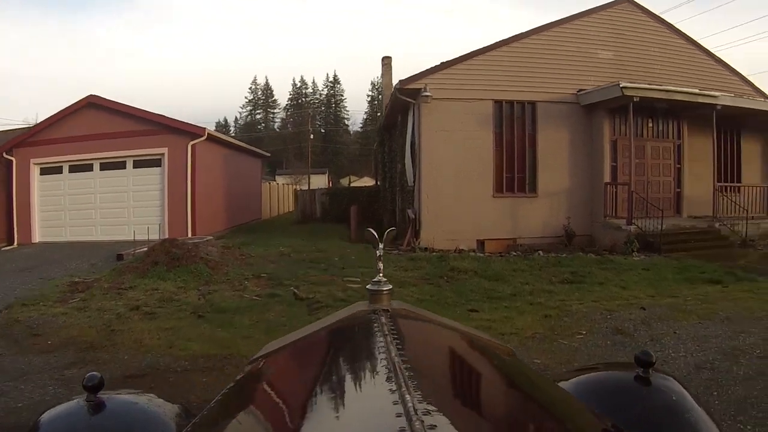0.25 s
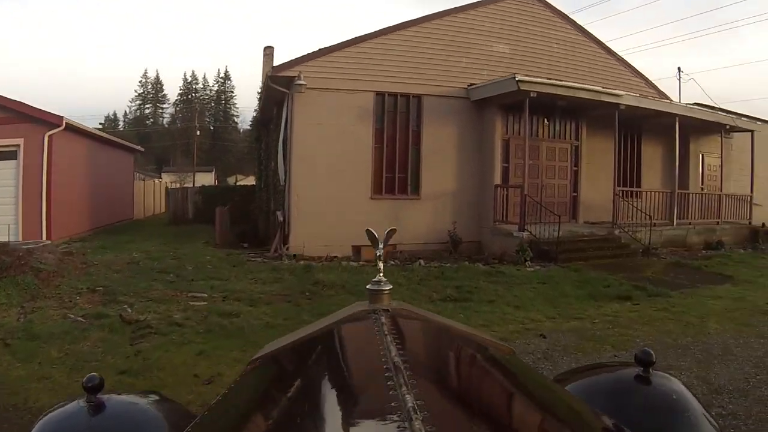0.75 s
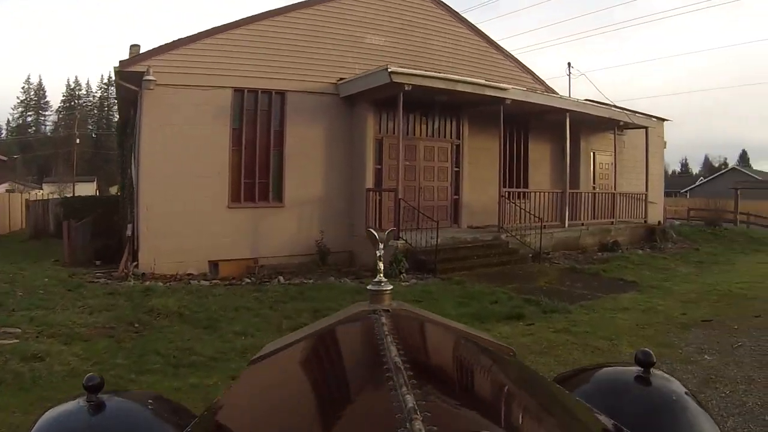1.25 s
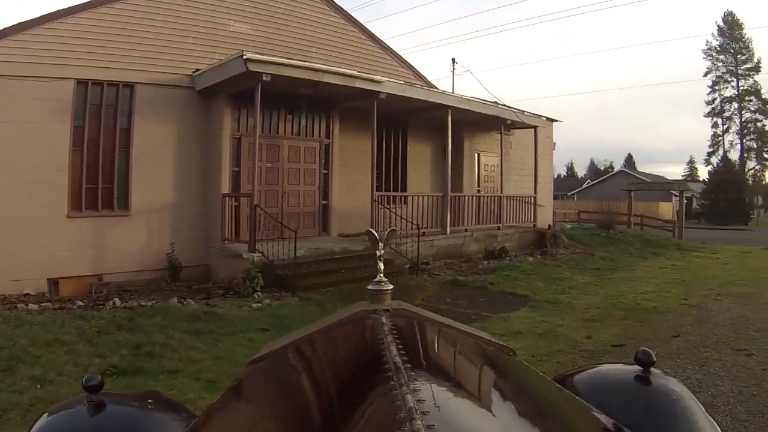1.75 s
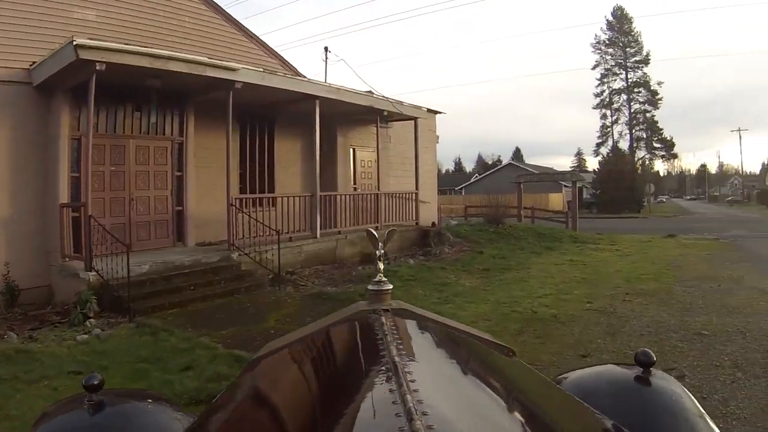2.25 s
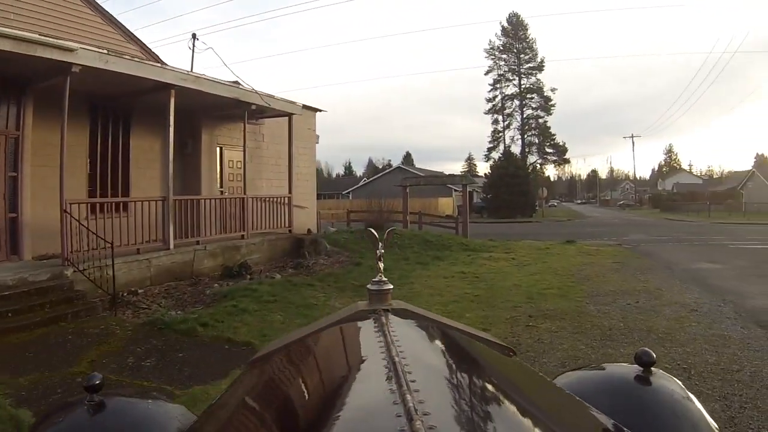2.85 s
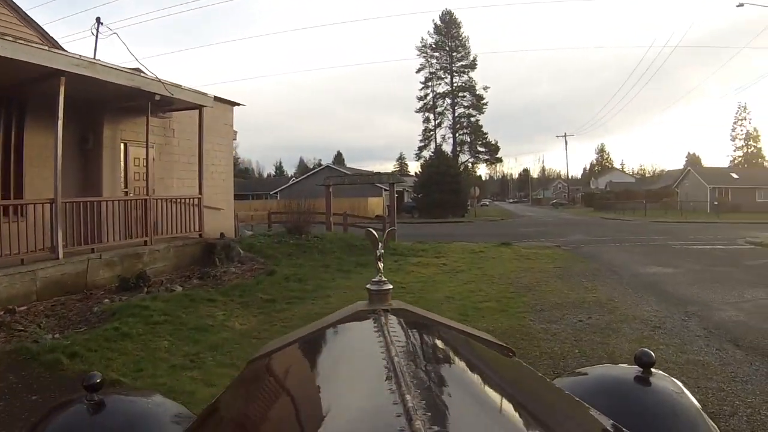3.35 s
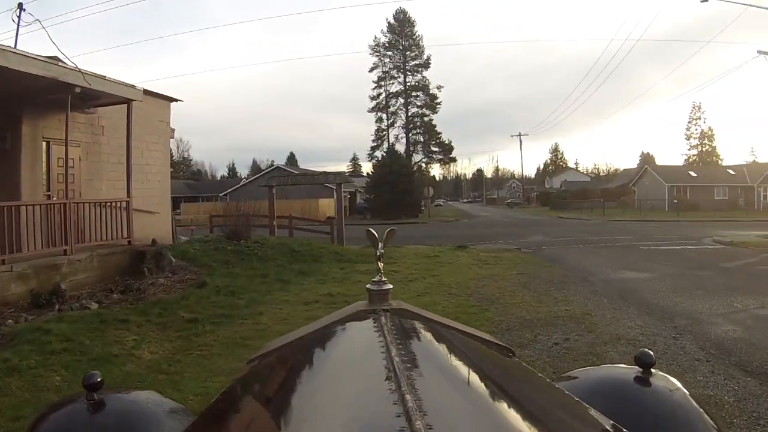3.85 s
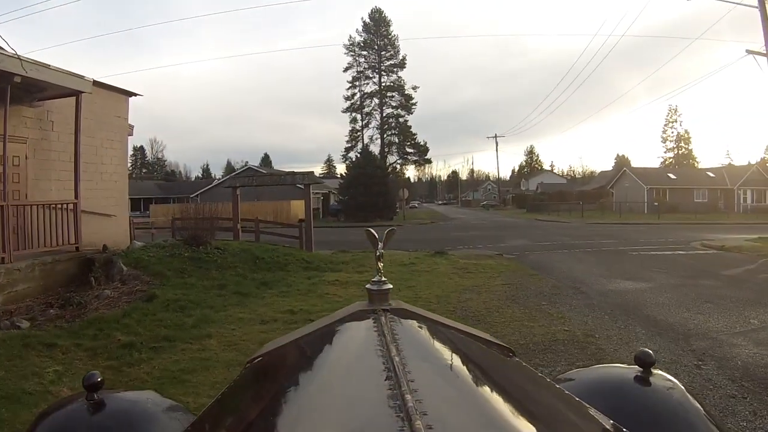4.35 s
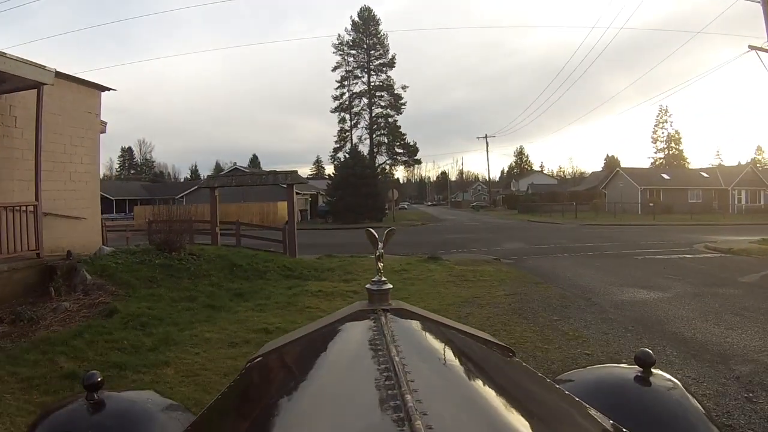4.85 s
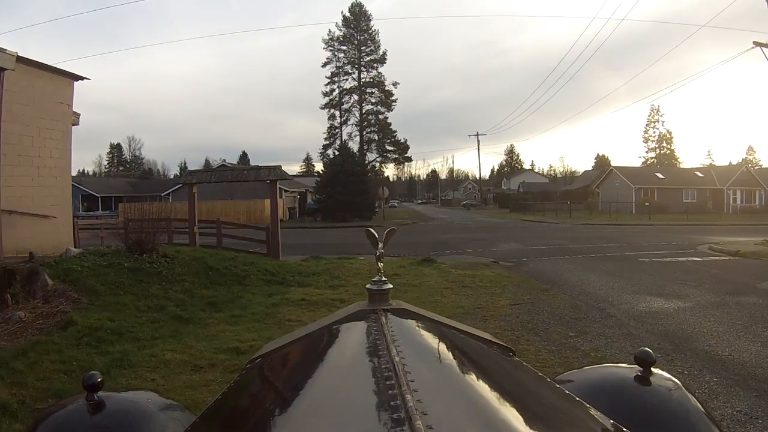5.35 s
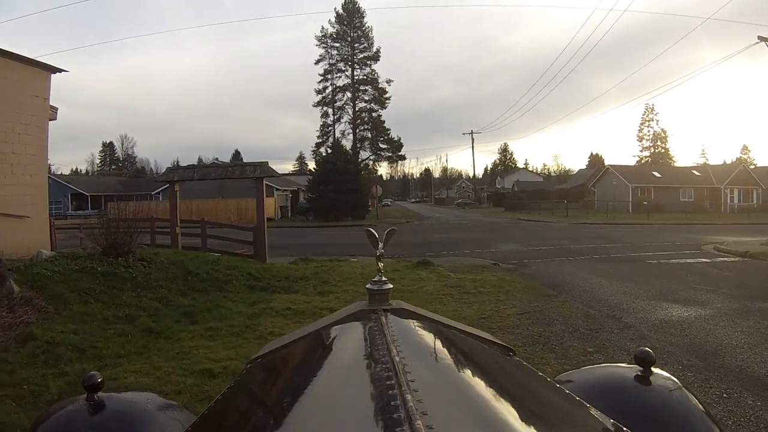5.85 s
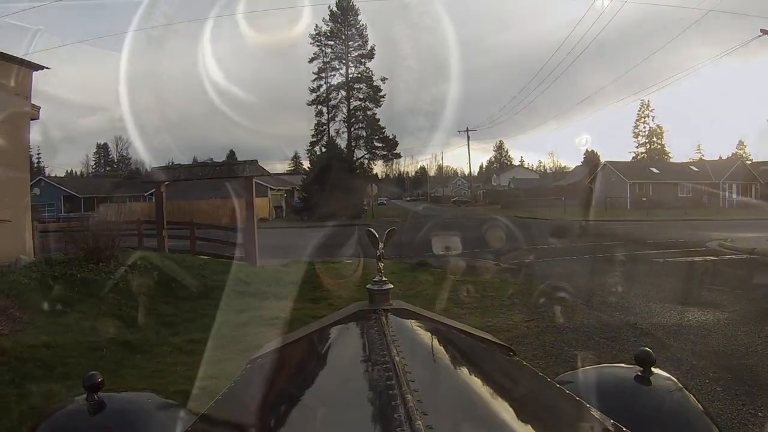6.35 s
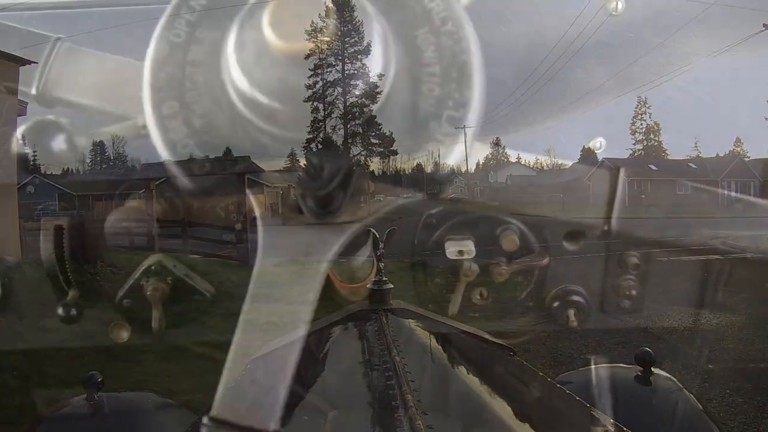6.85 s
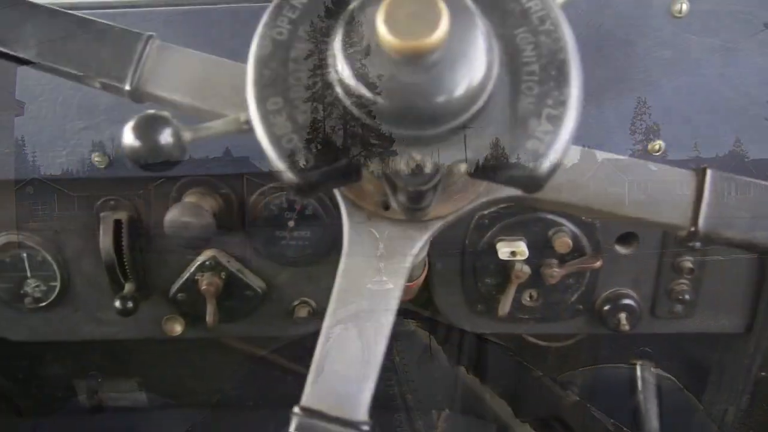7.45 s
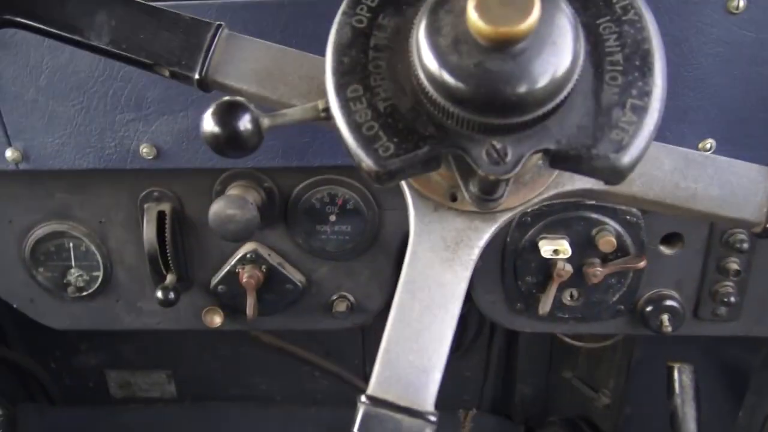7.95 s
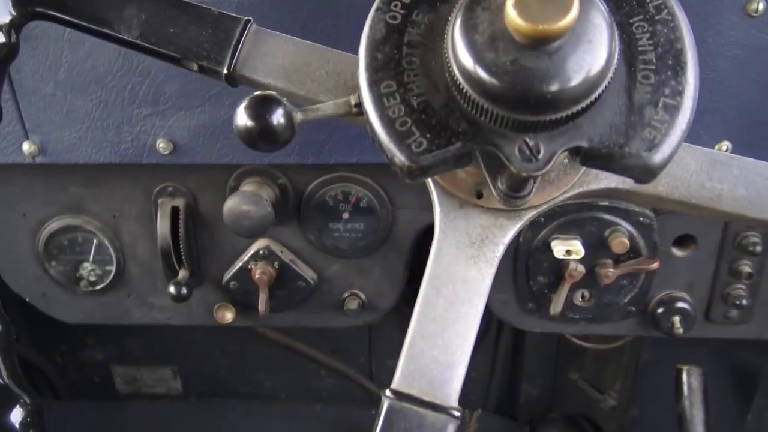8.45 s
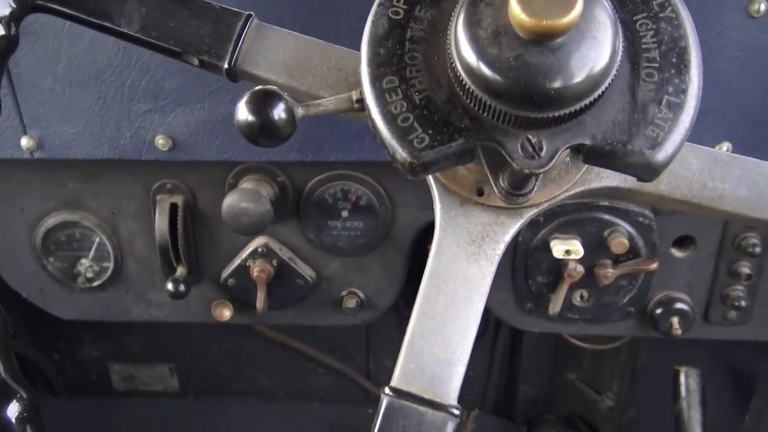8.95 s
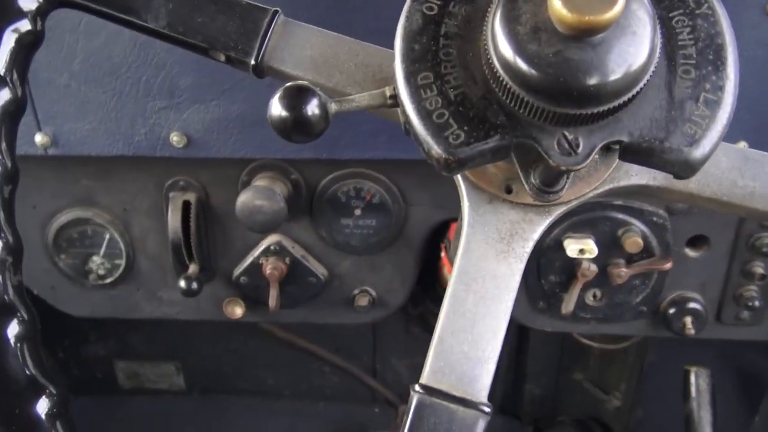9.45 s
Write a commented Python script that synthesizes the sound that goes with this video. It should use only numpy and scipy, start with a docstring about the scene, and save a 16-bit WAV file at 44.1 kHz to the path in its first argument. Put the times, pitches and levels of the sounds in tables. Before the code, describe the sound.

For the first six seconds an old car creeps over a rough gravel track, heard in mono from an enclosed microphone on the windscreen. The mount shudders with a deep rumble, panels drum over a boxy drone, and a loose part ticks irregularly. Bumps bring dull knocks, the hardest at about 1.8 seconds. Around 5.8 to 6.2 seconds the brakes give a faint, high squeak.

From 6 to 8 seconds this dissolves into the cabin, in stereo, where the engine is closer and louder, idling with an uneven putter and valve clatter. Just after 8 seconds it revs, with a brief, thin, very high belt squeal and a sharp tick. The roar is loudest near 8.7 seconds and roughly doubles in pitch by 9, with small metallic rasps. The throttle then closes and the engine runs on fast, humming, throbbing and burbling until about 9.7 seconds.

```python
"""A rough gravel track: an old six-cylinder car creeps along and brakes with a squeak, heard in mono from
a cased camera on the windscreen. The mount shakes and knocks, panels drum, a loose part rattles.
This dissolves to the cabin, in stereo: firing pulses ring exhaust and intake, valve gear clatters
through the bulkhead. The engine idles unevenly, is blipped with a belt squeal, then runs on and
burbles as the throttle closes."""
import sys
import numpy as np
from scipy import signal
from scipy.fft import rfft, irfft, next_fast_len
from scipy.io import wavfile
from scipy.ndimage import uniform_filter1d

SR = 44100
rng = np.random.default_rng(int(sys.argv[2]) if len(sys.argv) > 2 else 0)


def output_pcm(signal):
    """Save a mono or channel-first signal as 16-bit PCM at the path in sys.argv[1].

    Samples are clipped to [-1, 1] before scaling.
    """
    pcm = np.clip(np.atleast_2d(signal).T, -1, 1) * 32767
    wavfile.write(sys.argv[1], SR, np.round(pcm).astype(np.int16))


N = 427318
TIME_S = np.arange(N) / SR


def amp(db):
    """dB to gain."""
    return 10 ** (np.asarray(db) / 20)


def unit_rms(x):
    """Scale to rms 1."""
    return x / np.sqrt(np.mean(x ** 2) + 1e-20)


def spectrum(points, hz):
    """Interpolate on a log-frequency axis."""
    f, db = np.transpose(points)
    return np.interp(np.log(hz + 1), np.log(f + 1), db)


def humps(peaks, hz):
    """Resonances as bell curves in dB."""
    return sum(db / (1 + (2 * (hz - f) / width) ** 2) for f, width, db in peaks)


def curves(rows, t=TIME_S):
    """Each value column at times t."""
    s, *columns = np.transpose(rows)
    return [np.interp(t, s, c) for c in columns]


def add(mix, s, sound):
    """Mix in at s seconds."""
    part = mix[round(s * SR):][:len(sound)]
    part += sound[:len(part)]


def band(x, hz, width_hz):
    """Band-pass, rms 1."""
    sos = signal.butter(2, [hz - width_hz / 2, hz + width_hz / 2], "band", fs=SR, output="sos")
    return unit_rms(signal.sosfilt(sos, x))


def resonate(pulses, points):
    """Minimum-phase filter: rings only after each pulse."""
    log_gain = np.log(amp(spectrum(points, abs(np.fft.fftfreq(2 ** 15, 1 / SR)))))
    response = np.fft.ifft(np.exp(np.conj(signal.hilbert(log_gain)))).real[:8192]
    return signal.oaconvolve(pulses, response)[:N]


def drift(samples):
    """Slow random curve, rms 1."""
    return unit_rms(uniform_filter1d(uniform_filter1d(rng.standard_normal(N), samples), samples))


def steady(x, samples, floor):
    """Divide out the running rms."""
    return x / np.sqrt(abs(uniform_filter1d(x ** 2, samples)) + floor)


def noise(colour_db, size, patchy_db, flicker_db, motion_db=lambda hz, t: 0):
    """Patchy, flickering noise shaped by colour_db(hz); rms 1 before motion_db(hz, t)."""
    hop = size // 4
    frames, hz = N // hop + 5, np.fft.rfftfreq(size, 1 / SR)[:, None]
    real, imag, patch = rng.standard_normal((frames, len(hz), 3)).T
    patch = uniform_filter1d(patch, size // 100, axis=0)
    patch = unit_rms(uniform_filter1d(patch, 2048 // hop, axis=1))
    chance_db = patchy_db * patch + flicker_db * rng.standard_normal(frames)
    still = (real + 1j * imag) * amp(colour_db(hz) + chance_db)
    moving = still * amp(motion_db(hz, np.arange(frames) * hop / SR))
    still, moving = (signal.istft(z, nperseg=size, noverlap=size - hop)[1] for z in (still, moving))
    return moving[:N] / np.sqrt(np.mean(still ** 2))


def decay(samples, t60_s):
    """Exponential fall from 1."""
    return amp(-60 * np.arange(samples) / SR / t60_s)


def ring(hz, t60_s, rise_s):
    """One struck mode."""
    t = np.arange(round(t60_s * SR) + 64) / SR
    return np.sin(2 * np.pi * hz * t) * decay(len(t), t60_s) * np.minimum(t / rise_s, 1)


def friction_tone(rows, wobble_hz, flutter_db):
    """Phase and level of a wavering rub."""
    t = np.arange(rows[0][0], rows[-1][0], 1 / SR)
    hz, db = curves(rows, t)
    wobble, flutter = (unit_rms(uniform_filter1d(v, 150)) for v in rng.standard_normal((2, len(t))))
    level = np.sqrt(2) * amp(db + flutter_db * flutter) * signal.windows.tukey(len(t), .2)
    return 2 * np.pi * np.cumsum(hz + wobble_hz * wobble) / SR, level


# Hiss spectrum: f/Hz, level/dB
MIC_SPECTRUM = [(4000, -30), (7000, 0), (10000, -3), (11100, 0), (11900, -4), (12500, -4), (13300, -10),
                (14300, -3), (15100, -20), (15400, -40)]
def mic_hiss():
    """Self-noise of the outside microphone."""
    return amp(-74) * noise(lambda hz: spectrum(MIC_SPECTRUM, hz), 512, patchy_db=.8, flicker_db=.6)


# Rolling levels: t/s, panels/dB, drone/dB, mount/dB
ROLLING = [(0, -27.5, -33, -27), (1, -32.5, -35.5, -34.5), (2.2, -29.5, -35, -41), (3.3, -34, -35, -30),
           (4.5, -35, -36.5, -41.5), (6.1, -35.5, -37, -35.5)]
# Drone spectrum: f/Hz, level/dB
DRONE_SPECTRUM = [(40, -34), (65, -14), (101, -12), (219, -10), (268, -10), (417, -6), (691, -17),
                  (936, -15), (1490, -17), (2100, -29.5), (3000, -34.5), (3900, -42.5), (5500, -44),
                  (7500, -57), (11000, -77)]
# Case resonances and dips: f/Hz, width/Hz, gain/dB
CASE_MODES = [(386, 23, 5.5), (598.4, 25, -19), (630, 38, 7), (670, 25, -6.5), (801, 77, 9.5),
              (1159, 64, 9), (1648, 61, 12), (2350, 49, 7), (2910, 110, 6), (3170, 240, -8), (3440, 120, 8),
              (305, 30.5, 9), (5040, 250, 4), (6220, 660, 6)]
def case_drone():
    """Road and engine drone through the case; each resonance flares at random."""
    flares = [.12 * drift(5000)[::512] for _ in CASE_MODES]  # one value a frame

    def motion_db(hz, t):
        flare_db = sum(np.resize(v, len(t)) * humps([mode], hz) for v, mode in zip(flares, CASE_MODES))
        return curves(ROLLING, t)[1] + flare_db
    return noise(lambda hz: spectrum(DRONE_SPECTRUM, hz) + humps(CASE_MODES, hz), 2048,
                 patchy_db=1.3, flicker_db=1, motion_db=motion_db)


# Body panels: f/Hz, width/Hz, level/dB
BODY_MODES = [(114, 24.3, -2.5), (161.6, 19, -3), (217.8, 23.5, -0.5)]
def panel_drumming():
    """Shaken panels drum, swelling and sagging at random."""
    def colour_db(hz):
        return 10 * np.log10(sum(amp(db) ** 2 / (1 + (2 * (hz - f) / width) ** 4)
                                 for f, width, db in BODY_MODES))
    drumming = steady(noise(colour_db, 2048, patchy_db=.8, flicker_db=1.2), 5000, floor=.3)
    return drumming * amp(curves(ROLLING)[0] + 1.6 * drift(1800))


# Mount spectrum: f/Hz, level/dB
MOUNT_SPECTRUM = [(12, -60), (22, -14), (30, -4), (37, 0), (46, -4), (60, -22), (85, -40), (200, -140)]
# Ruts: centre/s, length/s, level/dB
RUTS = [(0.087, 0.14, -26), (0.298, 0.091, -26), (0.426, 0.1, -24), (0.565, 0.063, -27), (0.89, 0.29, -25),
        (1.168, 0.17, -29), (1.38, 0.18, -26), (1.53, 0.15, -26), (1.69, 0.19, -25), (1.956, 0.38, -20),
        (2.265, 0.21, -27.5), (2.67, 0.67, -25.5), (3.026, 0.18, -32), (3.185, 0.091, -43),
        (3.387, 0.089, -42), (3.894, 0.26, -30), (4.14, 0.26, -29), (4.65, 0.48, -36), (5.004, 0.22, -29.5),
        (5.453, 0.096, -39)]
def mount_shudder():
    """The mount hums and shudders in each rut."""
    hum = noise(lambda hz: spectrum(MOUNT_SPECTRUM, hz), 4096, patchy_db=.3, flicker_db=.3)
    level = amp(curves(ROLLING)[2] + 1.6 * drift(3000))
    for s, length_s, db in RUTS:
        add(level, max(s - length_s / 2, 0), amp(db) * signal.windows.tukey(round(length_s * SR), .8))
    return steady(hum, 3000, floor=.1) * level


# Engine cycles while rolling: t/s, count
CYCLE_COUNT = [(.109, 0), (.909, 4), (1.684, 8), (2.038, 10), (2.721, 14), (3.177, 17), (4.1435, 23),
               (5.338, 30), (7.1, 40)]
def tappet():
    """A tappet chirps once a cycle, slightly uneven."""
    out = np.zeros(N)
    times_s, cycles = np.transpose(CYCLE_COUNT)
    for s in np.interp(np.arange(41), cycles, times_s):
        force, detune = rng.standard_normal(2)
        add(out, s, amp(-45.5 + 1.5 * force) * ring(3440 * (1 + .015 * detune), t60_s=.022, rise_s=.004))
    return out


# Bumps: t/s, knock/dB, f/Hz, click/dB
WHEEL_DROPS = [(0.042, -5.5, 86.4, -39), (0.346, -4, 229, -45), (0.9, -10, 216, -44),
               (1.134, -10.5, 215, -46), (1.33, -10.5, 109, -46), (1.807, 5.5, 210, -19.5),
               (1.92, -1.5, 217, -35), (2.243, -3.5, 213, -48), (2.468, -11, 192, -45),
               (2.85, -6.5, 212, -37), (3.038, -12, 111, -35), (3.205, -3, 178, -28),
               (3.553, -9.5, 217, -48), (4.444, -11, 216, -45), (4.671, -10, 470, -25),
               (4.82, -10, 116, -49), (5.03, -15, 110, -52), (5.553, -13, 156, -42), (5.713, -27, 222, -39)]
def mount_knocks():
    """A wheel drops; the mount knocks and clicks."""
    out = np.zeros(N)
    for s, db, hz, click_db in WHEEL_DROPS:
        add(out, s, amp(db) * ring(hz, t60_s=.047, rise_s=.011))
        click = band(band(rng.standard_normal(1500), 1300, 1900), 1300, 1900)
        click *= decay(1500, t60_s=.035) * np.minimum(np.arange(1500) / 90, 1)
        add(out, s + .0009, amp(click_db) * click / abs(click).max())
    return out


# Loose part: f/Hz, level/dB, t60/s
LOOSE_MODES = [(1750, -5, .016), (2400, -2, .016), (2850, -3, .015), (3500, -12, .014)]
def case_tick(hz, crack_db, chance, grit):
    """A loose part hits the case: main pitch, modes, scuff and crack; peak 1."""
    out = np.zeros(3000)
    add(out, 0, ring(hz, t60_s=.02, rise_s=.002))
    for (f, db, t60_s), c in zip(LOOSE_MODES, chance):
        add(out, .002 * c, amp(db + 2 - 9 * c) * ring(f * (.94 + .12 * c), t60_s, rise_s=.002))
    scuff, crack = grit[:, round(chance[0] * SR):][:, :1500] * np.minimum(np.arange(1500) / SR / .003, 1)
    add(out, 0, (amp(-3) * scuff + amp(crack_db) * crack) * decay(1500, t60_s=.04))
    return out / abs(out).max()


# Clear ticks: t/s, peak/dB, f/Hz, relative crack/dB
CASE_HITS = [(0.2084, -39, 2200, -22), (0.4309, -34.5, 2290, -12), (0.4825, -39, 2370, -22),
             (0.635, -42, 2000, -22), (0.8223, -31.5, 2080, -23), (0.9164, -35, 2120, -21),
             (1.1917, -40, 2230, -25), (1.2436, -32, 2160, -23), (1.718, -39, 2040, -20),
             (1.776, -33, 2000, -25), (1.935, -33, 2470, -19), (1.9893, -27, 2100, -18),
             (2.3615, -36.5, 2460, -19), (2.4134, -38, 2170, -24), (2.832, -39, 2060, -24),
             (2.9723, -28.5, 2690, -21), (3.027, -28, 2110, -17), (3.1774, -33, 1850, -22),
             (3.2306, -32, 2170, -16), (3.4865, -42, 1890, -22), (3.576, -33, 2400, -22),
             (3.806, -36.5, 2490, -14), (3.9784, -39, 2250, -22), (4.0003, -42, 2490, -22),
             (4.207, -36.5, 2320, -27), (4.4575, -32, 2450, -23), (4.671, -48, 2300, -36),
             (4.858, -39, 3460, -24), (4.9034, -38, 1900, -21), (4.9547, -35, 2480, -18),
             (5.5044, -37, 2400, -22), (5.72, -40, 2720, -22), (5.8802, -39, 2500, -22)]
def case_rattle():
    """The loose part ticks clearly over a faint random patter."""
    out = np.zeros(N)
    scuff, crack = rng.standard_normal((2, 2 * SR))
    grit = np.array([band(band(scuff, 2350, 1600), 2350, 1600), band(crack, 5300, 2400)])
    for s, db, hz, crack_db in CASE_HITS:
        add(out, s, amp(db) * case_tick(hz, crack_db, rng.random(4), grit))
    for when, force, pitch, *chance in rng.random((110, 7)):
        add(out, 8 * when, amp(-52.5 + 11 * force) * case_tick(2000 + 1000 * pitch, -21, chance, grit))
    return out


# Brake squeaks, one list each: t/s, f/Hz, level/dB
SQUEAKS = [
    [(5.745, 3930, -75), (5.761, 3900, -63), (5.767, 4000, -52), (5.775, 3727, -76)],
    [(5.86, 3950, -72), (5.874, 3980, -80), (5.91, 3910, -46), (5.92, 3900, -51), (5.996, 3660, -44),
     (6.118, 3720, -57), (6.126, 3700, -49), (6.17, 3640, -77)],
]
def brake_squeak():
    """The drum sings a tone and its octave."""
    out = np.zeros(N)
    for rows in SQUEAKS:
        phase, level = friction_tone(rows, wobble_hz=25, flutter_db=1.5)
        add(out, rows[0][0], level * (np.sin(phase) + amp(-20) * np.sin(2 * phase)))
    return out


# Engine in the cabin: t/s, firing rate/Hz, throttle/0-1
ENGINE_RUN = [(5.9, 32.3, 0), (7.0, 31.6, 0), (7.4, 32.2, 0), (7.8, 31.3, 0), (8.0, 32.6, .15),
              (8.2, 33.8, .3), (8.5, 42.8, .9), (8.6, 46.8, 1), (8.9, 63.4, 1), (9.0, 68.0, .85),
              (9.2, 70.3, .45), (9.4, 70.0, .25), (9.69, 65.4, .2)]
def engine_state(t=TIME_S):
    """Firing rate, throttle, crank turns (three firings each) and idle share."""
    rate_hz, throttle = curves(ENGINE_RUN, t)
    return rate_hz, throttle, np.cumsum(rate_hz) * t[1] / 3, np.clip((36 - rate_hz) / 3, 0, 1)


def cabin_fade_db(t):
    """Fade-in, complete at 6 s."""
    return -400 * np.maximum(6 - t, 0)


# Clatter levels: t/s, level/dB, hiss boost/dB
CLATTER_LEVELS = [(6.2, -34, 4), (6.55, -27.5, 7), (6.9, -21.5, 2.5), (7.9, -17, 7.5), (8.1, -14.5, 15),
                  (8.4, -11.5, 20), (8.7, -13.5, 15), (9.0, -13, 17), (9.2, -12, 17), (9.32, -12.5, 10),
                  (9.45, -13, 4), (9.69, -14.5, -2)]
# Clatter spectrum: f/Hz, level/dB
CLATTER_SPECTRUM = [(18, -49), (30, 14.5), (111, -10), (161, 3), (244, 2.5), (301, -1.5), (344, -8.5),
                    (496, -14.5), (645, -17.5), (795, -20), (1030, -24.5), (2040, -35), (5390, -50.5),
                    (8420, -55.5), (15800, -76)]
# Bulkhead and dash: f/Hz, width/Hz, gain/dB
BULKHEAD_MODES = [(159.6, 46, 16), (215, 9.3, 9.5), (290.3, 66.2, -31), (350, 8.7, 2), (413, 7.3, -5.5),
                  (520, 7, 7.5), (654, 11, 8), (794, 52, -12.5), (1060, 43, 9), (1292, 19, 10),
                  (1530, 38, 0), (1410, 40, 2.5), (1810, 350, 4), (2040, 60, -4.5), (2190, 31, 0.5)]
# Valve gear at open throttle: f/Hz, width/Hz, gain/dB
SNARL_MODES = [(910, 27, 1.5), (1180, 33, 6), (1390, 69, 3), (2870, 52, -11), (3360, 62, 4), (3880, 52, 9),
               (3900, 1050, -4.5)]
# Whistles of a nearly shut throttle: f/Hz, width/Hz, gain/dB at depth 1
WHISTLE_MODES = [(4400, 52, 0.5), (5800, 50, -1), (6370, 83, 6), (7350, 50, 0), (8180, 70, 5),
                 (8470, 51, 5), (9460, 50, -8)]
# Whistle prominence: t/s, depth
WHISTLE_DEPTH = [(6.2, .7), (7.0, 0.44), (7.7, 1.5), (7.78, 1.4), (8.12, 2), (8.22, .1), (9.69, .1)]
def clatter():
    """Valve gear, fan and intake through the bulkhead, brighter with speed; two noise draws."""
    surge_db = .07 * drift(1500)

    def colour_db(hz):
        muffle_db = -15 * (hz < 240) - 8 * (hz < 60)  # room for the exhaust beat
        return spectrum(CLATTER_SPECTRUM, hz) + humps(BULKHEAD_MODES, hz) + muffle_db

    def motion_db(hz, t):
        level_db, hiss_db = curves(CLATTER_LEVELS, t)
        level_db += cabin_fade_db(t) - 60 * np.maximum(6.2 - t, 0)
        rate_hz, throttle, turns, idle = engine_state(t)
        rasp_db = 2.5 * np.log2(rate_hz / rate_hz[0]) + 6 * throttle
        rasp_band = np.clip(np.log2(hz / 1500 + 1e-9), 0, 1) * np.clip(np.log2(14000 / (hz + 1)), 0, 1)
        hiss_band = np.clip(np.log2(hz / 7000 + 1e-9), 0, 1)
        chuff_db = .5 * idle * np.cos(2 * np.pi * (turns - .34))
        flutter_db = (np.interp(t, TIME_S, surge_db) + chuff_db) * np.clip(hz / 3000, 0, 1)
        whistle_db = curves(WHISTLE_DEPTH, t)[0] * humps(WHISTLE_MODES, hz)
        low_cut_db = -6 * (hz > 60) * (hz < 240) - 2.5 * (hz > 240) * (hz < 750)
        return (level_db + rasp_band * rasp_db + hiss_band * hiss_db + flutter_db + whistle_db
                + throttle * humps(SNARL_MODES, hz) + (1 - idle) * low_cut_db)
    return [noise(colour_db, 2048, patchy_db=1.3, flicker_db=1, motion_db=motion_db) for _ in range(2)]


# Linkage: t/s, level/dB, f/Hz
LINKAGE_HITS = [(7.6, -28, 1700), (8.607, -22, 6800), (9.2, -30, 5300)]
def linkage_ticks():
    """The linkage ticks: fast-decaying noise."""
    out = np.zeros(N)
    for s, db, hz in LINKAGE_HITS:
        add(out, s, amp(db) * band(rng.standard_normal(600), hz, 3000) * decay(600, t60_s=.012))
    return out


# Rasps: t/s, level/dB, f/Hz
VALVE_RASPS = [(8.241, -32.5, 2940), (8.535, -48, 3370), (8.764, -32, 3280), (8.8748, -32, 3300),
               (8.918, -34, 3330), (8.96, -35, 3470), (9.01, -31, 3330), (9.0562, -28, 3770),
               (9.0953, -32.5, 3000), (9.1691, -31.5, 2880), (9.2213, -29.5, 3480), (9.497, -50, 9000),
               (9.582, -47.5, 9500), (9.67, -49, 9400)]
def valve_rasps(pitch_ratio=1.09):
    """Valve gear at speed rasps at two neighbouring pitches."""
    out = np.zeros(N)
    for s, db, hz in VALVE_RASPS:
        pair = sum(band(rng.standard_normal(2000), hz * pitch_ratio ** k, hz / 7) for k in (-.5, .5))
        add(out, s - .012, amp(db) * unit_rms(pair) * np.hanning(2000))
    return out


# Belt modes, one list each: t/s, f/Hz, level/dB
BELT_MODES = [
    [(8.07, 14330, -62), (8.11, 14380, -46), (8.16, 14395, -40), (8.2, 14380, -43), (8.26, 14365, -40),
     (8.31, 14340, -33), (8.38, 14400, -35), (8.4, 14410, -52)],
    [(8.35, 14760, -50), (8.39, 14780, -33), (8.44, 14780, -29), (8.475, 14778, -30), (8.5, 14780, -50),
     (8.53, 14775, -55)],
]
def belt_squeal():
    """The slipping belt jumps between two pitches in a haze of hiss."""
    out = np.zeros(N)
    for rows in BELT_MODES:
        phase, level = friction_tone(rows, wobble_hz=8, flutter_db=2.5)
        haze = unit_rms(uniform_filter1d(rng.standard_normal(len(phase)), 24))
        add(out, rows[0][0], level * np.sin(phase) * (1 + .52 * haze))
    return out


def body_rock():
    """At speed the body rocks once a crank turn."""
    rate_hz, _, turns, _ = engine_state()
    return np.sqrt(2) * amp(-26 + 40 * np.log2(rate_hz / rate_hz.max())) * np.sin(2 * np.pi * turns)


# Engine levels: t/s, exhaust beat/dB, fan/dB
ENGINE_LEVELS = [(6.0, -48, -56), (6.3, -30, -53), (6.6, -26, -50), (6.9, -23, -45), (7.2, -21, -46),
                 (7.5, -20, -47), (8.0, -18, -49), (8.35, -19, -42), (8.5, -12.5, -41), (8.6, -9.5, -40),
                 (8.75, -7.5, -38), (8.9, -10, -36), (9.0, -14, -30), (9.1, -15, -27), (9.3, -14.5, -21),
                 (9.5, -13.5, -15), (9.69, -14.5, -16)]
def fan_hum():
    """The fan hums at crank orders 6, 8 and 16."""
    crank = 2 * np.pi * engine_state()[2]
    hum = np.sin(8 * crank + 2.2) + amp(-7) * np.sin(6 * crank) + amp(-12) * np.sin(16 * crank)
    return np.sqrt(2) * amp(curves(ENGINE_LEVELS)[1]) * hum


# Burble envelope: t/s, level/dB
BURBLE_LEVEL = [(8.85, -60), (9.0, -19), (9.3, -13), (9.45, -17), (9.69, -19.5)]
# Pop spectrum: f/Hz, level/dB
POP_SPECTRUM = [(40, -31), (80, -35), (120, -10.5), (160, -10.5), (200, 0), (235, -7.5), (280, -28),
                (1000, -110)]
def burble(offset_turns=.72, spread_db=2):
    """As the throttle closes the pipe pops unevenly, once a crank turn."""
    at = np.flatnonzero(np.diff(np.floor(engine_state()[2] - offset_turns)))
    pulses = np.zeros(N)
    pulses[at] = amp(spread_db * rng.standard_normal(300)[:len(at)])
    pops = resonate(pulses, POP_SPECTRUM)
    return pops / np.std(pops[-SR // 2:]) * amp(curves(BURBLE_LEVEL)[0])


# Cylinder imbalance: added pulse strength, in firing order
IMBALANCE = [6.5, 1.5, 8.5, 7, 2, 4]
# Pipe and cabin boom: f/Hz, level/dB
PIPE_SPECTRUM = [(20, -44), (32, -18), (60, -28), (95, -25), (125, -23), (150, -10), (164, 0), (178, -7),
                 (192, -18), (215, -13), (245, -16), (290, -30), (500, -30), (1500, -110)]
# Intake roar: f/Hz, level/dB
INTAKE_SPECTRUM = [(15, -53), (23, -13), (40, -22), (58, -23.5), (72, -10.5), (92, 2), (106, -7),
                   (127, -14.5), (140, -10.5), (160, -1), (185, -5.5), (205, -7), (235, -12), (270, -34.5),
                   (1000, -110)]
# Block thud: firing rate/Hz, level re beat/dB
BLOCK_THUD = [(20, -23), (34, -3.5), (40, -1), (48, -6), (60, -18), (75, -43)]
# Overrun throb: t/s, depth/0-1
THROB_DEPTH = [(8.9, 0), (9.03, 1), (9.42, 1), (9.52, .35), (9.69, .35)]
def engine_beat():
    """Firings ring pipe and intake and thud the block; an open throttle evens them out."""
    rate_hz, throttle, turns, idle = engine_state()
    at = np.flatnonzero(np.diff(np.floor(3 * turns)))
    chance = rng.standard_normal(800)[:len(at)]
    pulses = np.zeros(N)
    pulses[at] = amp(5 + 16 * throttle[at]) + np.resize(IMBALANCE, len(at)) + .7 * chance
    roar_db = np.minimum(-15.5 + 88 * np.log2(rate_hz / rate_hz[0]), 10.5)
    beat = resonate(pulses, PIPE_SPECTRUM) + amp(roar_db) * resonate(pulses, INTAKE_SPECTRUM)
    lope_db = 1.3 * (1.5 - throttle) * drift(1300)
    thud = amp(spectrum(BLOCK_THUD, rate_hz)) * np.sin(2 * np.pi * 3 * turns)
    beat = steady(beat, 6000, floor=1e-12) * amp(lope_db) + thud
    throb_db = 6 * curves(THROB_DEPTH)[0] * (np.cos(2 * np.pi * (turns - .92)) - .3 + .15 * drift(900))
    putter_db = 3 * idle * np.cos(2 * np.pi * (turns - .38))
    return beat * amp(curves(ENGINE_LEVELS)[0] + throb_db + putter_db)


# Cabin balance: f/Hz, left minus right/dB
BALANCE = [(60, 3.0), (130, 2.5), (290, -4), (640, -1), (1410, -0.5), (3100, 0.3), (6820, -0.3),
           (15000, -0.3)]
# Clatter that differs between ports: f/Hz, gain/dB
SIDE_SPECTRUM = [(30, -18), (100, -69), (300, -67), (700, -20), (1500, -23.5), (3300, -49), (5500, -20),
                 (9000, -8.5), (12000, -18), (15500, -28)]
def cabin():
    """The engine at two close microphone ports: pitch-dependent balance, small side signal."""
    mid_clatter, side_clatter = clatter()
    engine = (engine_beat() + fan_hum() + body_rock() + burble()) * amp(cabin_fade_db(TIME_S))
    size = next_fast_len(N + 4096)
    hz = np.fft.rfftfreq(size, 1 / SR)
    mid = rfft(engine + mid_clatter + belt_squeal() + linkage_ticks() + valve_rasps(), size)
    side = rfft(side_clatter, size) * amp(spectrum(SIDE_SPECTRUM, hz))
    lean = amp(spectrum(BALANCE, hz) / 2)
    return irfft(np.array([mid * lean + side, mid / lean - side]), size)[:, :N]


# Outside fade-out: t/s, gain/dB
OUTSIDE_FADE = [(0, 0), (6.0, 0), (6.6, -2), (7.3, -7), (8.0, -30), (9.7, -60)]
def scene():
    """Mono outside dissolves into the stereo cabin."""
    outside = mount_shudder() + panel_drumming() + case_drone() + mic_hiss()
    outside += mount_knocks() + case_rattle() + tappet() + brake_squeak()
    return outside * amp(curves(OUTSIDE_FADE)[0]) + cabin()


def record(dry):
    """Clip at full scale, ramp in, low-pass at 15850 Hz."""
    clipped = np.clip(.94 * dry, -1, 1) * np.minimum(np.arange(N) / 200, 1)
    low_pass = signal.firwin(1023, 15850, window=("kaiser", 9), fs=SR)
    return signal.oaconvolve(clipped, low_pass[None], "same")


dry = scene()
out = record(dry)
output_pcm(out)
```